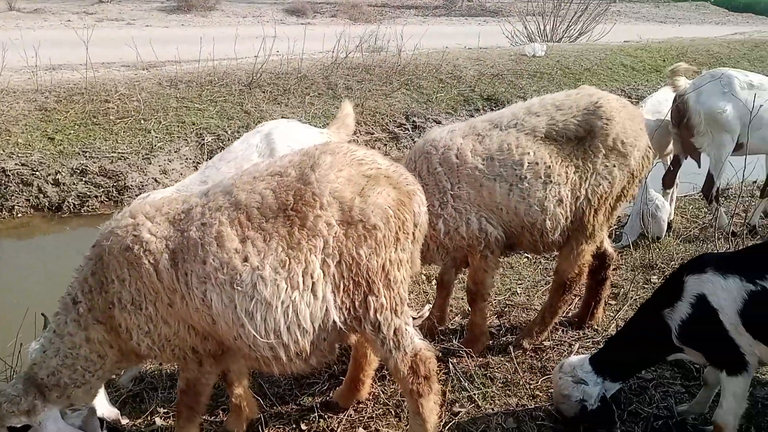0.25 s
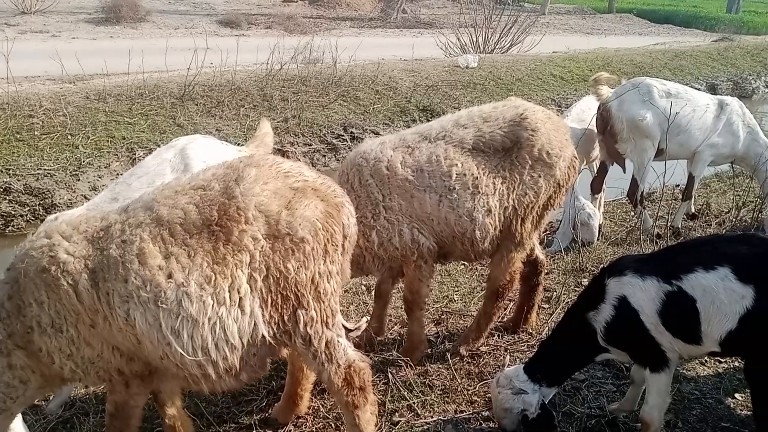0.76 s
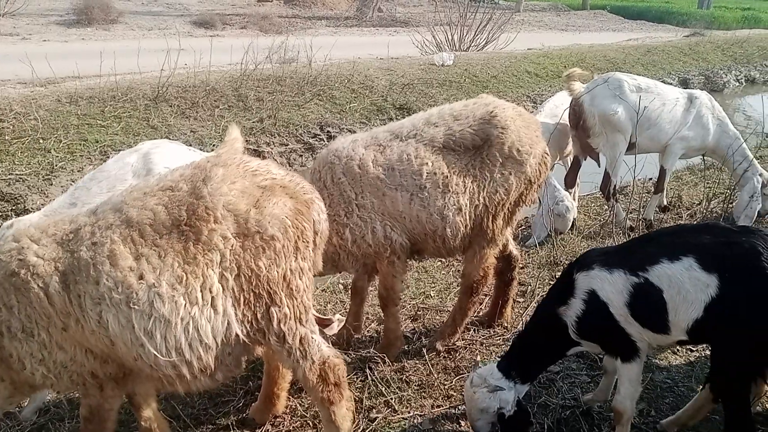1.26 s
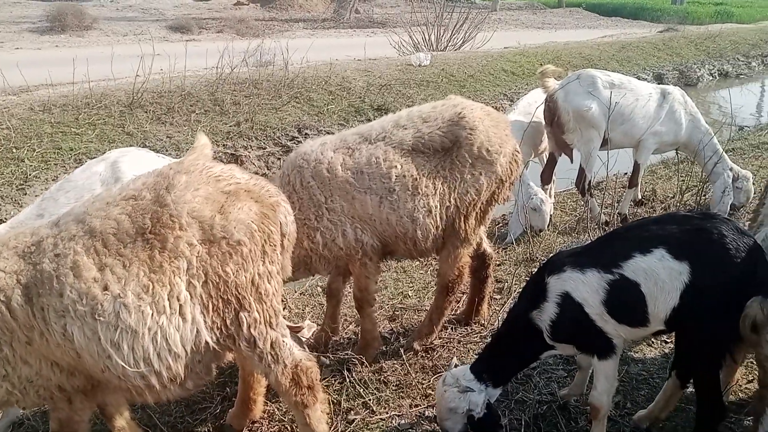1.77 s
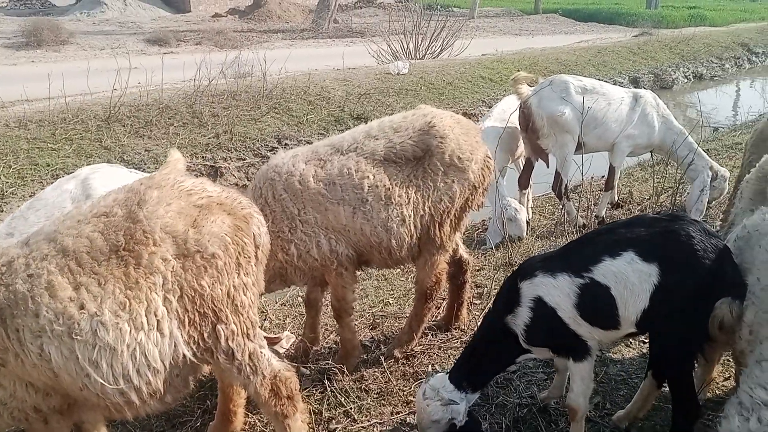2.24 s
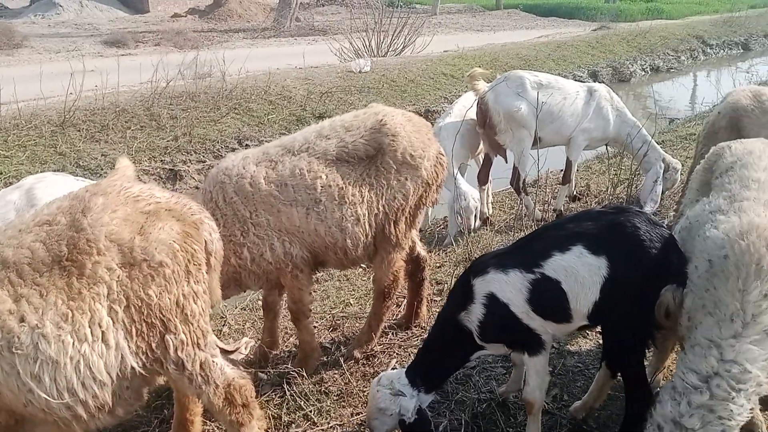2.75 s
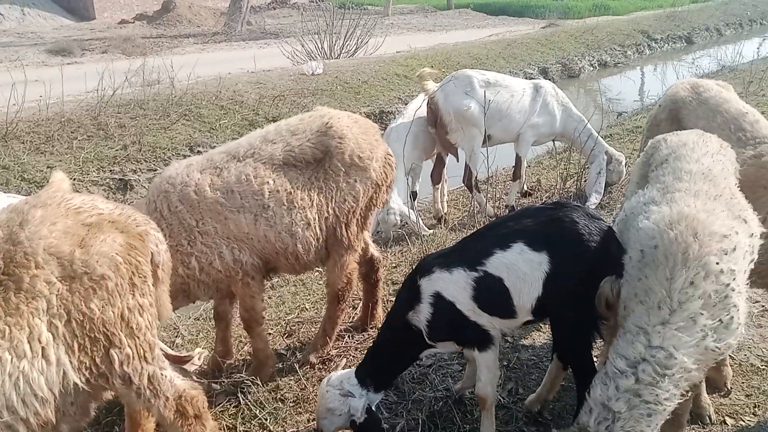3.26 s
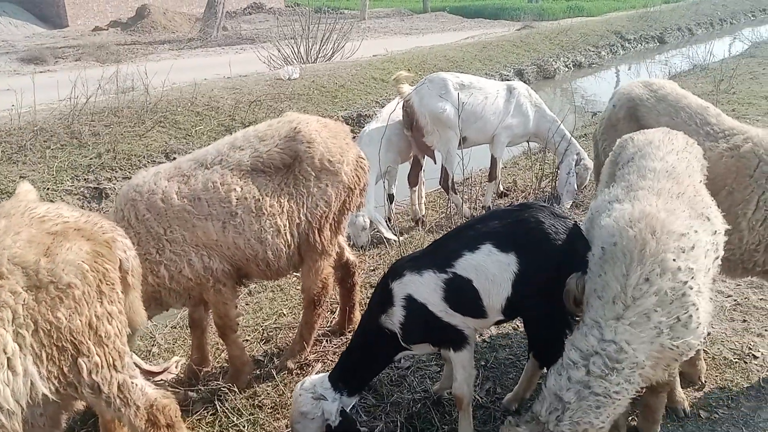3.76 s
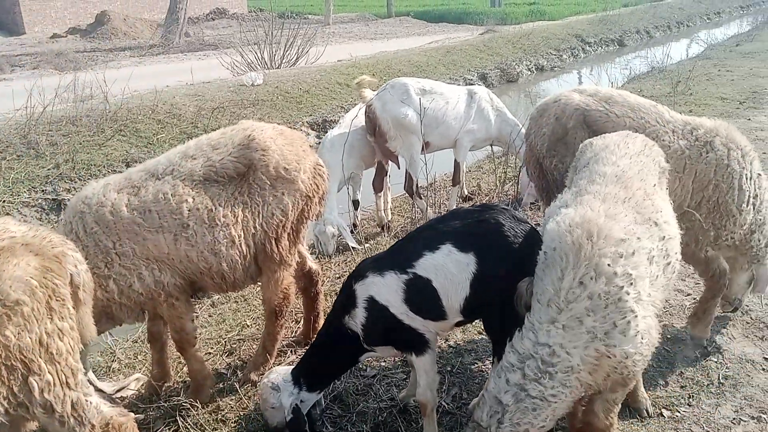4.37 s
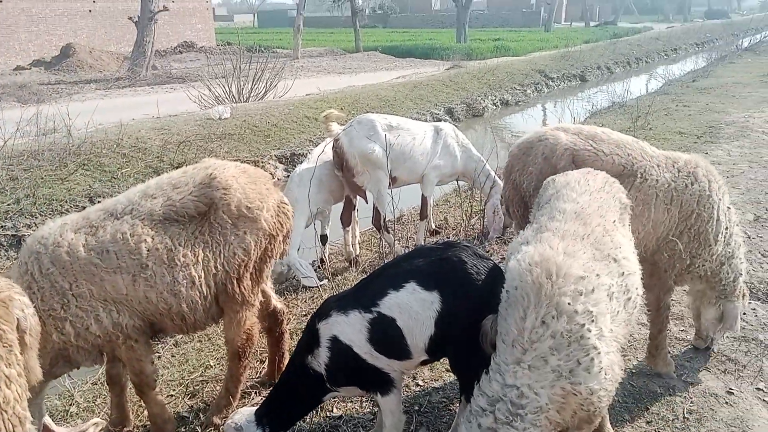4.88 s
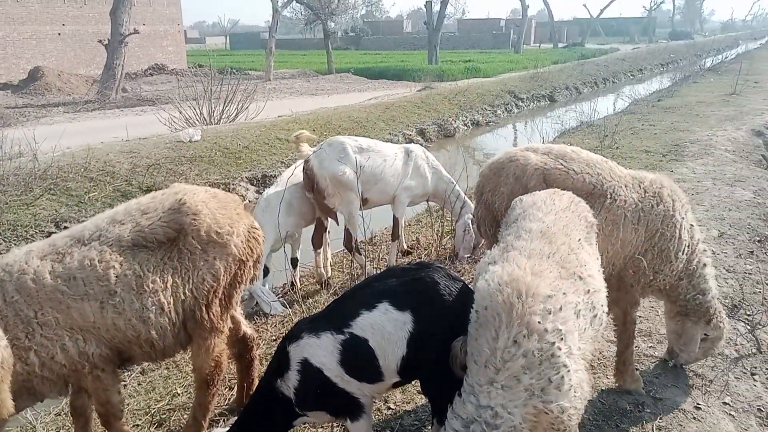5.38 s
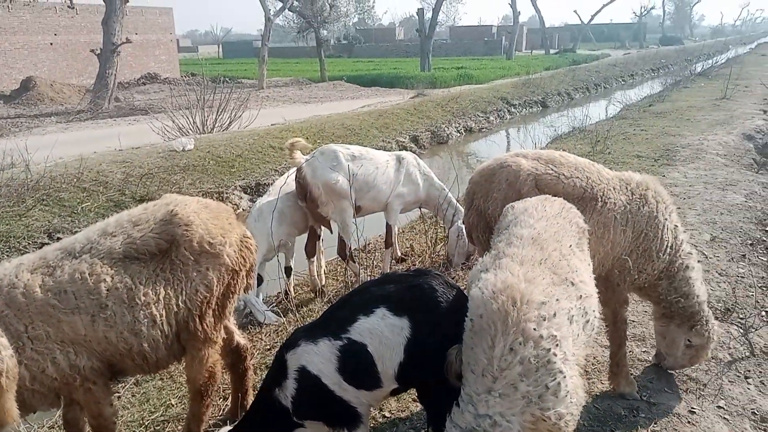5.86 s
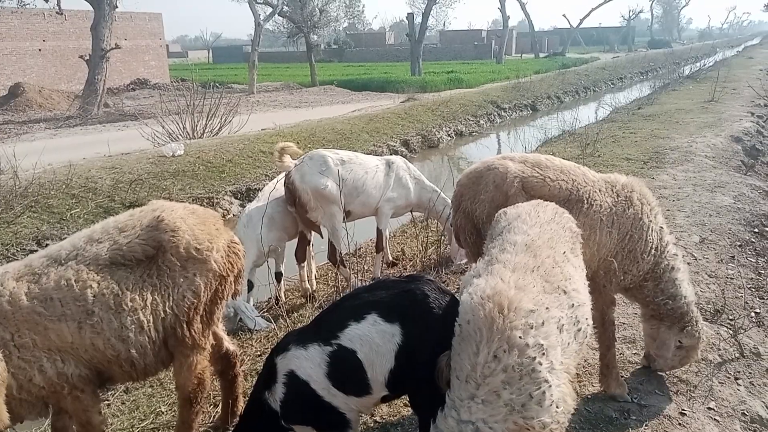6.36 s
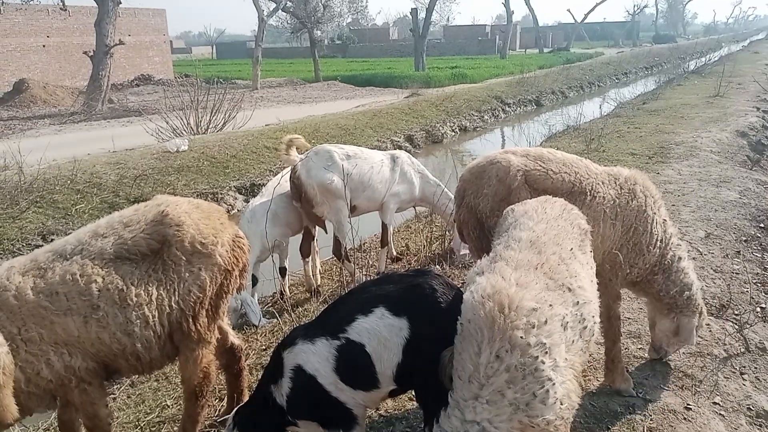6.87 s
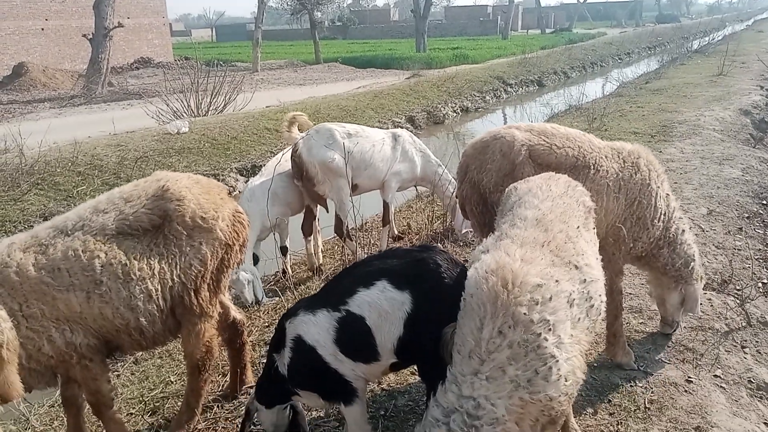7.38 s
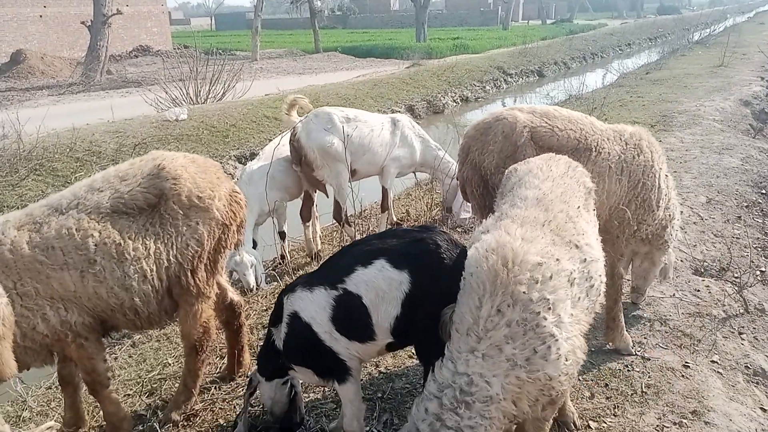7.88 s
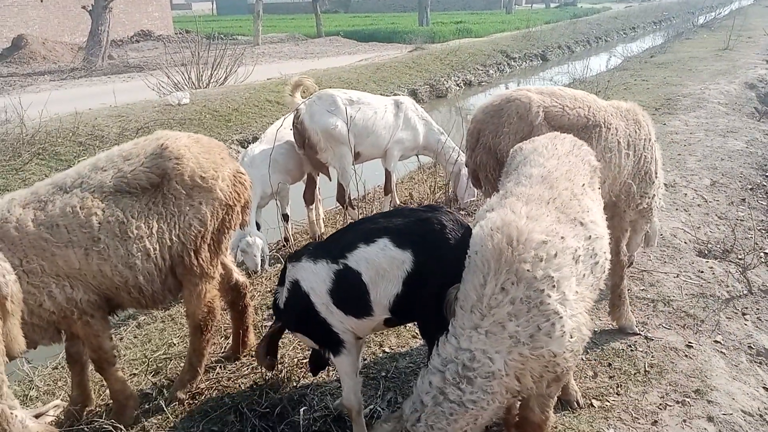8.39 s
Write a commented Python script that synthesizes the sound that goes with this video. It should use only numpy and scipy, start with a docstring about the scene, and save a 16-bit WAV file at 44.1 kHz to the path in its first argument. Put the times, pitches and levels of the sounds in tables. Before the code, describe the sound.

Dry stalks crack and tear under grazing mouths outdoors, over crow caws, bird chirps, rising whistles and later trills, with two short hoarse bleats.

```python
"""Goats and sheep crop dry grass on a canal bank, close by throughout: cracks and rings of stalks, puffs of noise.
First crows caw in far trees (rattling harmonics through a throat) over a small bird's bent notes and buzzes;
from 2 s a bird whistles upward, a kid bleats hoarsely at 3.3 and 7.7 s, and clear caws begin near 3.9 s.
A low hum comes up after 4.6 s; from 5.9 s trills, sagging notes and long slides take over.
Far birds (faint sine slides) and shaped noise for hush and light wind on a phone microphone lie beneath."""
import sys
import numpy as np
from scipy import signal
from scipy.fft import rfft, irfft, next_fast_len
from scipy.io import wavfile
from scipy.ndimage import uniform_filter1d, map_coordinates

SR = 44100
rng = np.random.default_rng(int(sys.argv[2]) if len(sys.argv) > 2 else 0)


def wav_record(signal):
    """Record a signal, one row per channel, as 16-bit PCM in the file named by sys.argv[1]."""
    frames = np.transpose(np.atleast_2d(signal))
    bounded = np.clip(frames, -1, 1)
    # unit amplitude maps onto the largest positive 16-bit level
    quanta = np.round(bounded * 32767).astype(np.int16)
    wavfile.write(sys.argv[1], SR, quanta)


N = 380583


def amp(db):
    """Amplitude factor of a level in dB."""
    return 10 ** (np.asarray(db) / 20)


def unit(x):
    """x scaled to an rms of 1."""
    return x / np.sqrt(np.mean(x ** 2) + 1e-20)


def along(points, hz):
    """Values at hz between (Hz, value) points, on a log frequency axis."""
    f, v = np.transpose(points)
    return np.interp(np.log(hz + 1), np.log(f + 1), v)


def add(track, start, x, edge=0.000485):
    """Mix x into the track from sample start, with soft edges of the given seconds."""
    t = np.arange(len(x)) / SR
    x = x * np.clip(np.minimum(t, t[-1] - t) / edge, 0, 1)
    x = x[:N - start]
    track[start:start + len(x)] += x


def wobble(rate, size=N):
    """A smooth random curve, rate knots a second."""
    knots = rng.standard_normal(int(size * rate / SR) + 4)
    return map_coordinates(knots, [np.arange(size) * rate / SR])


def filtered(x, response):
    """x times a complex response of frequency."""
    m = next_fast_len(len(x) + 8192)
    return irfft(rfft(x, m) * response(np.fft.rfftfreq(m, 1 / SR)), m)[:len(x)]


def noise(spectrum, patchy_db):
    """Coloured noise of rms 1 with time-frequency patches of random gain."""
    z = signal.stft(rng.standard_normal(N), nperseg=512)[2]
    patches = uniform_filter1d(rng.standard_normal(z.shape), size=6, axis=0)
    patches = uniform_filter1d(patches, size=10, axis=1)
    x = signal.istft(z * amp(patchy_db * unit(patches)), nperseg=512)[1][:N]
    return unit(filtered(x, lambda hz: amp(along(spectrum, hz))))


def snaps_and_thuds():
    """Stalks part in a hissing crack and ring on; decaying sines make low thuds and one higher ring."""
    # snapping stalks: (time [s], level [dB], hiss of the crack beside its ring [dB])
    snaps = [(0.304, -47.5, 3), (0.431, -54, -3), (0.4919, -61, -3), (0.5378, -53.5, -13),
             (1.6117, -51.5, 6), (1.9302, -33, -4), (1.9473, -50, -2.5), (2.076, -52.5, 10.5),
             (2.432, -45.5, -16), (2.465, -56, -8), (2.57, -52.5, -18), (2.9131, -51, -8),
             (2.9276, -40, -4), (3.0898, -51, -7), (3.9297, -48, -11), (4.2263, -50, -4),
             (4.245, -27.5, -4), (4.544, -67, 9), (4.561, -59, 2.5), (4.65, -62, 0), (4.8742, -35, 2),
             (5.2691, -53, 0.5), (5.3426, -44, -8), (5.477, -43.5, -6), (5.6456, -52, 1), (5.691, -42, -19),
             (5.8379, -44, -15), (5.8651, -45.5, -16), (6.0562, -39.5, -27), (7.144, -46.5, -20),
             (7.399, -49, -3), (7.5982, -53, 10), (7.7512, -43, -2)]
    # low thuds, and one higher ring under a snap: (time [s], starting level [dB], pitch [Hz])
    thuds = [(2.85, -46, 450), (2.927, -40, 2320), (3.522, -52, 465), (4.244, -50, 420),
             (4.872, -56.5, 321), (5.865, -52.5, 670), (7.145, -61, 423)]
    out, t = np.zeros(N + SR), np.arange(round(.045 * SR)) / SR
    for (s, db, sharp_db), ring_hz in zip(snaps, rng.uniform(5470, 7400, len(snaps))):
        # the fibres part: noise differenced twice, so mostly treble
        crack = amp(-60 * t / 0.0086) * np.diff(rng.standard_normal(len(t) + 2), n=2) / 2
        modes = np.sin(2 * np.pi * ring_hz * t) + 0.36 * np.sin(np.pi * ring_hz * t)
        ring = amp(-60 * t / 0.012) * modes * (1 + 0.63 * wobble(900, size=len(t)))
        onset = 1 + 1.5 * amp(-60 * t / 0.003)
        out[round(s * SR):][:len(t)] += amp(db + 0.5) * (amp(sharp_db) * crack + 0.7 * ring) * onset
    for s, db, hz in thuds:
        out[round(s * SR):][:len(t)] += amp(db - 60 * t / 0.042) * np.sin(2 * np.pi * hz * t)
    return out[:N]


def torn_grass():
    """Torn mouthfuls, small cracks and a dry rustle: one coloured noise under three kinds of envelope."""
    # mouthfuls torn off: (time [s], length [s], level before the wobble and grit [dB])
    tears = [(0.46, 0.045, -67), (0.818, 0.28, -72), (1.348, 0.14, -77), (1.587, 0.052, -52.5),
             (1.696, 0.063, -61), (1.798, 0.27, -64.5), (2.089, 0.181, -71), (4.036, 0.3, -69),
             (4.46, 0.1, -71), (4.805, 0.15, -72.5), (5.04, 0.25, -67), (5.255, 0.21, -67),
             (6.63, 0.94, -72), (7.114, 0.073, -67.5), (7.515, 0.12, -65.5), (7.717, 0.09, -56)]
    # colour of dry grass: (frequency [Hz], relative level [dB per Hz])
    rustle = [(1760, -53.5), (3000, -5), (3690, 0), (5490, 7.5), (9320, -5.5), (13500, -9), (15500, -14.5)]
    rustle_db, grit_share = -91, .8  # resting rustle; how much single fibres stand out of it
    effort = np.full(N, amp(rustle_db))
    for s, length, db in tears:
        add(effort, round(s * SR), amp(db - 2 * np.arange(0, 1, 1 / (length * SR))), edge=0.03)
    chance = 50 / SR * amp(4 * wobble(6))  # of a crack, per sample
    t = np.arange(400) / SR
    fibres = (rng.random(N) < 350 / SR) * rng.exponential(size=N)
    grit = np.convolve(fibres, amp(-60 * t / 0.0087))[:N]
    cracks = (rng.random(N) < chance) * amp(19.4 * rng.random(N))
    puffs = signal.lfilter([1], [1, -np.exp(-1 / (0.003 * SR))], cracks)  # each crack is a puff of noise
    tearing = effort * amp(4.2 * wobble(22)) * (1 + grit_share * grit)
    return (tearing + amp(-76.5) * puffs) * noise(rustle, patchy_db=5)


def grazing():
    """Close to the microphone: single snaps and thuds over the tearing of grass."""
    return snaps_and_thuds() + torn_grass()


def voice(hz, orders, rattle_hz, depth, rough, swing, lift_hz, lift_width_hz=220, lift_db=0):
    """Harmonics on a pitch that a slower rattle shakes in strength and frequency; a resonance lifts some."""
    rattle_hz = rattle_hz * (1 + rough * wobble(38.7, size=len(hz)))
    turn = 2 * np.pi * np.cumsum(rattle_hz) / SR
    shaken_hz = hz * (1 + swing * np.cos(turn) + rough * wobble(159.5, size=len(hz)))
    phase = 2 * np.pi * np.cumsum(shaken_hz) / SR
    tone = 0
    for k, db in orders:
        lift = lift_db * np.exp(-((k * hz - lift_hz) / lift_width_hz) ** 2)
        tone = tone + amp(db + lift) * np.sin(k * phase + k * k)
    return (1 + depth * np.sin(turn)) * tone * np.sqrt(2)


def harsh_caws():
    """Rattling bursts with rasp go through throat resonances, which move up towards mid-caw."""
    # (time [s], length [s], level ahead of the throat [dB], first, last rattle [per s], widest opening [0-1])
    caws = [(-.2, 0.3, -50, 79, 77.5, 0.65), (0.19, 0.42, -52.5, 83.4, 66.4, 0.42),
            (0.94, 0.14, -66, 80.5, 76, 1), (1.138, 0.5, -58, 79, 68.5, 0.94),
            (2.22, 0.4426, -55.5, 76.5, 70.4, 0.56), (3.079, 0.43, -50.5, 76.4, 72.2, 0.7),
            (5.705, 0.26, -66.5, 75.2, 71.3, 1)]
    # unsteadiness of each caw in turn: (share of pitch and rattle rate, also sets the rasp)
    hoarse = [.006, .005, .01, .007, .014, .016, .012]
    # throat resonances: (frequency [Hz], width [Hz], level [dB]), all frequencies scaled by the opening
    resonances = [(1490, 460, -6.5), (1758, 326, 6), (2300, 420, -43), (4530, 325, -10),
                  (5430, 2000, -21.5)]
    top_hz, pitch_sag, swing = 453, .1, 0.1  # sag: share lost at both ends; swing: shake by the rattle
    throat_shut, throat_open = 0.99, 1.069  # factors on the resonances
    harsh, opening = np.zeros(N), np.zeros(N)
    for (s, length, db, first, last, widest), rough in zip(caws, hoarse):
        t = np.arange(max(-s, 0), length, 1 / SR)  # a call may already be under way at the start
        start, arch = round(max(s, 0) * SR), np.sin(np.pi * t / length)
        pitch_hz = top_hz * (1 - pitch_sag * (2 * t / length - 1) ** 2)
        rattle_hz = first + (last - first) * t / length
        even = [(k, 0) for k in range(3, 14)]  # equally strong harmonics
        call = voice(pitch_hz, even, rattle_hz, depth=.6, rough=rough, swing=swing, lift_hz=1850)
        opening[start:][:len(t)] = np.clip(widest, 0, 1) * arch
        rasp = 60 * rough * rng.standard_normal(len(t))
        add(harsh, start, amp(db) * arch ** 0.68 * (call + rasp))

    def throat(f):
        total = 0
        for k, (centre, width, db) in enumerate(resonances):
            band = 1j * f * width / (centre * centre - f * f + 1j * f * width)
            total = total + (-1) ** k * amp(db) * band ** 2
        return total

    shut = filtered(harsh * (1 - opening), lambda f: throat(f / throat_shut))
    opened = filtered(harsh * opening, lambda f: throat(f / throat_open))
    return amp(-1.5) * (shut + opened)


def clear_caws():
    """Arched harmonics after a squeak; the beak lifts whichever harmonic passes its resonance."""
    # (time [s], length [s], top pitch [Hz], base level [dB], tilt above fourth harmonic [dB per harmonic])
    calls = [(3.884, 0.38, 622, -71.5, -2.5), (6.647, 0.37, 616.4, -68.5, 0.5),
             (7.461, .39, 609.7, -70.5, 2), (8.562, 0.37, 629.6, -75.5, 1)]
    # harmonics before tilt and beak: (multiple of the pitch, level [dB])
    harmonics = [(2, -28), (3, 0), (4, 0), (5, -11), (6, -8), (7, -16)]
    # arch of a call: (share of the length, pitch factor, gain over the base level [dB])
    share, factor, gain_db = np.transpose([(0, .8, 2), (0.102, .92, 14), (.25, .99, 11),
                                           (0.621, 1.001, 11.5), (.8, .92, 12.5), (1.002, .8, 13)])
    beak_hz, beak_rise_hz, beak_db = 1850, 320, 11  # rises late in the call
    out = np.zeros(N + SR)
    for s, length, top_hz, db, tilt_db in calls:
        orders = [(k, level + tilt_db * max(k - 4, 0)) for k, level in harmonics]
        u = np.arange(0, 1, 1 / (length * SR))
        hz = uniform_filter1d(top_hz * np.interp(u, share, factor), size=900, mode="nearest")
        lift_hz = beak_hz + beak_rise_hz * np.clip((u - .55) / .15, 0, 1)
        call = voice(hz, orders, rattle_hz=70.32, depth=0.11, rough=.007, swing=0.028,
                     lift_hz=lift_hz, lift_db=beak_db)
        call = amp(db + np.interp(u, share, gain_db)) * call
        squeak = whistle(np.linspace(1950, 2550, num=900), db + 17.0)
        add(out, round((s - .004) * SR), squeak)
        out[round(s * SR):][:len(u)] += call * np.clip(np.minimum(u, 1 - u) / 0.026, 0, 1)
    return out[:N]


def crows():
    """Crows in far trees: harsh rattling caws and clear ones that keep their harmonics."""
    return harsh_caws() + clear_caws()


def kid():
    """Hoarse bleats with lines halfway between the harmonics; the voice breaks downward midway."""
    # one table a bleat: (time [s], pitch [Hz], level ahead of the harmonics [dB])
    bleats = [
        [(3.335, 869, -57), (3.39, 882, -54), (3.415, 995, -51), (3.445, 852, -51), (3.49, 888, -51),
         (3.552, 826, -48), (3.58, 841, -68)],
        [(7.725, 804, -60), (7.775, 941, -51.5), (7.812, 964, -49.5), (7.832, 882, -49.5), (7.92, 852.4, -46),
         (7.95, 835, -56), (7.985, 820, -61)],
    ]
    # lines of the voice before the nose: (multiple of the pitch, level [dB])
    orders = [(1, -18.5), (1.5, -16), (2, 5), (2.5, -8), (4, -29), (4.5, -32.5), (5, -32)]
    nose_hz, nose_db = 3980, 20.5  # a high resonance
    out = np.zeros(N)
    for s, hz, db in map(np.transpose, bleats):
        t = np.arange(s[0], s[-1], 1 / SR)
        call = voice(np.interp(t, s, hz), orders, rattle_hz=63.38, depth=.7, rough=.014, swing=.022,
                     lift_hz=nose_hz, lift_db=nose_db)
        add(out, round(s[0] * SR), amp(np.interp(t, s, db)) * call, edge=0.0086)
    return out


def whistle(hz, db, overtone_db=-26, waver_db=2.5):
    """A bird's tone: a sine of slightly unsteady level with weak overtones."""
    hz = uniform_filter1d(hz, size=90)
    phase = 2 * np.pi * np.cumsum(hz) / SR
    tone = np.sin(phase) + amp(overtone_db) * (np.sin(2 * phase) + 0.19 * np.sin(3 * phase))
    return np.sqrt(2) * amp(db + waver_db * wobble(150.0, size=len(hz))) * tone


def curved(length, start_hz, middle_hz, end_hz, db, overtone_db, swell=0.22):
    """A note whose pitch bends through three points; swell 0 is level, 1 a full swell and fade."""
    u = np.arange(0, 1, 1 / (length * SR))
    hz = start_hz * (1 - u) * (1 - 2 * u) + 4 * middle_hz * u * (1 - u) + end_hz * u * (2 * u - 1)
    return np.sin(np.pi * u) ** np.abs(swell) * whistle(hz, db, overtone_db)


def chirped_phrases():
    """One bird repeats a phrase of bent notes, each time at its own pitch, pace and brightness."""
    # notes before a phrase's own factors and gains:
    # (delay [s], length [s], start [Hz], middle [Hz], end [Hz], level [dB], overtones [dB])
    phrase = [(0, .021, 6480, 5630, 4190, -44, -27), (0.024, 0.017, 4100, 3700, 3500, -43, -16),
              (0.034, 0.024, 3646, 3063, 3060, -35, -22), (0.076, 0.021, 3190, 2860, 2990, -35, -23.5),
              (0.104, 0.022, 3170, 2900, 2980, -35, -23), (0.127, .021, 3150, 2894, 2251, -38, -19.5),
              (0.152, 0.032, 2105, 1991, 1990, -37, -60)]
    # (time [s], pitch factor, time factor, gain [dB],
    #  more gain of the high lead-in [dB], of the low last note [dB], of the overtones [dB])
    chirps = [(0.601, 1.024, 0.98, -4, -5, -12.5, 1.5), (0.89, 1.003, 1.015, -9.5, -24, -20, -18.5),
              (1.151, 0.97, 1.07, -8, 6, -12, 4), (1.443, 0.94, 1.014, -8.5, -11, -12, -21.5),
              (1.747, .98, 1.001, -6.5, 8.5, -14, 4), (2.039, 0.99, 0.94, -14, -5.5, -9, -20.5)]
    out = np.zeros(N)
    for s, factor, pace, gain_db, lead_db, last_db, bright_db in chirps:
        extra_db = [lead_db] + [0] * (len(phrase) - 2) + [last_db]
        for (delay, length, *hz, db, overtone_db), more_db in zip(phrase, extra_db):
            note = curved(pace * length, *factor * np.array(hz), db + gain_db + more_db,
                          overtone_db + bright_db, swell=0.21)
            add(out, round((s + pace * delay) * SR), note)
    return out


def rising_whistles():
    """Tones climb ever more slowly towards a pitch, then end in a hoarse, fading quiver."""
    # (time [s], length without the quiver [s], pitch approached [Hz], level [dB])
    whistles = [(2.012, 0.083, 2220, -54), (2.233, 0.097, 2205, -51.5), (2.459, 0.12, 2212, -52),
                (2.694, 0.13, 2190, -50), (2.937, 0.096, 2184, -47.5), (3.201, 0.092, 2162, -45),
                (3.47, 0.082, 2180, -44.5), (3.75, 0.08, 2154, -48), (4.01, 0.11, 2160, -48.5),
                (4.305, 0.098, 2162, -49.5), (4.581, 0.1, 2177, -48), (4.859, 0.1, 2194, -47),
                (5.153, 0.11, 2181, -48.5), (5.452, 0.1, 2176, -55)]
    out = np.zeros(N)
    for s, length, end_hz, db in whistles:
        t = np.arange(0, length, 1 / SR)
        hz = end_hz - 170 * np.exp(-t / 0.0442) - 150 * np.exp(-t / 0.0074)
        rise = whistle(hz, db - 14 * np.exp(-t / 0.0051), overtone_db=-58.0, waver_db=1.6)
        add(out, round(s * SR), rise, edge=0.002)
        end = np.arange(0, .03, 1 / SR)
        shaken_hz = end_hz - 30 + 300 * np.sin(2 * np.pi * 130 * end)
        add(out, round((s + length) * SR), whistle(shaken_hz, db - 10 - 200 * end, waver_db=5))
    return out


def loose_notes():
    """Several small birds: sines that bend, stay steady, sag at the end or slide with a fading octave."""
    # curved notes: (time [s], length [s], start [Hz], middle [Hz], end [Hz], level [dB])
    notes = [(0, 0.12, 5780, 4300, 2850, -63.5), (0.132, 0.02, 3846, 5970, 3700, -60),
             (0.161, 0.014, 3580, 4590, 5500, -56), (0.169, 0.035, 4340, 4020, 3350, -58),
             (0.246, 0.066, 5200, 5200, 4600, -58.5), (0.435, 0.032, 6040, 5360, 4320, -55.5),
             (0.467, 0.0326, 4120, 4000, 3195, -54.5), (0.863, 0.053, 2900, 4000, 3200, -62),
             (0.917, 0.0127, 4015, 4074, 3830, -65), (0.926, 0.034, 3850, 5500, 4600, -55.5),
             (1.076, 0.016, 4740, 5330, 4370, -54), (1.309, 0.057, 4500, 4550, 3410, -58.5),
             (1.693, 0.05, 6473, 5680, 4550, -61.5), (1.949, 0.029, 4720, 4270, 3680, -53.5),
             (2.231, 0.026, 4430, 4190, 3720, -62), (2.939, 0.031, 5320, 5100, 4530, -61.5),
             (4.128, 0.026, 4960, 4580, 4000, -57.5), (5.081, 0.076, 7235, 6030, 5400, -64.5),
             (5.156, 0.05, 5280, 4664, 4200, -65), (5.222, 0.033, 4100, 3817, 3260, -65),
             (7.207, 0.16, 5747, 5440, 3930, -54), (7.551, 0.02, 6430, 6080, 6030, -57.5),
             (7.573, 0.084, 6750, 5470, 4370, -54.5), (7.783, 0.062, 6500, 5965, 4500, -51),
             (7.892, 0.025, 6400, 4880, 2980, -53.5), (8.015, 0.061, 3150, 4040, 3156, -60.5),
             (8.082, 0.029, 4150, 5512, 4680, -47.5), (8.162, 0.0081, 5140, 5730, 5000, -48),
             (8.172, 0.0075, 5050, 6690, 4900, -46.5), (8.176, 0.0069, 3950, 3687, 3900, -54.5),
             (8.193, 0.045, 3070, 3360, 2724, -58), (8.396, 0.029, 2408, 2425, 1950, -59.5)]
    # steady notes, low hoots to short high peeps: (time [s], length [s], pitch [Hz], level [dB])
    steady = [(1.7, 0.0586, 2458, -63.5), (2.102, 0.014, 6573, -58), (2.846, 0.0086, 3930, -60.5),
              (3.826, 0.016, 3320, -54.5), (4.102, 0.029, 8970, -64.5), (4.427, 0.027, 3330, -69),
              (4.512, 0.0184, 3300, -66), (7.27, 0.13, 1197, -70), (5.086, 0.028, 9010, -62),
              (6.853, 0.071, 1411, -58.5), (7.085, 0.11, 1482, -63.5), (7.097, 0.049, 1718, -59.5),
              (7.13, 0.063, 2150, -53.5), (7.335, 0.13, 1470, -61.5), (7.49, 0.076, 1168, -71),
              (7.613, 0.109, 1448, -61.5), (8.39, 0.18, 1164, -71)]
    # held notes: (time [s], hold [s], pitch [Hz], sag [s], end [Hz], level before the sag [dB])
    held = [(5.944, 0.047, 2411, 0.034, 1870, -53), (6.244, 0.11, 2370, 0.037, 1640, -56.5),
            (6.748, 0.061, 2322, 0.032, 1553, -48.5), (7.894, 0.0637, 2229, 0.0099, 2187, -49.5),
            (8.133, 0.0845, 2198, 0.0265, 1950, -45.5), (8.424, 0.071, 2228, 0.084, 1500, -45)]
    # falling slides: (time [s], length [s], start [Hz], middle [Hz], end [Hz], level before its loss [dB])
    slides = [(5.964, 0.205, 4270, 2197, 1604, -43.5), (6.509, 0.17, 4420, 2630, 1530, -40.5)]
    sag_loss_db, slide_loss_db = 7.5, 9  # fainter by the end
    octave_db, octave_fade_db = -15.5, 38  # the octave over a slide, and its loss by the end
    out = np.zeros(N)
    for s, *note in notes:
        add(out, round(s * SR), curved(*note, overtone_db=-38.0))
    for s, length, hz, db in steady:
        add(out, round(s * SR), curved(length, hz, hz, hz, db, overtone_db=-35.0))
    for s, hold, hz, sag, end_hz, db in held:
        u = np.clip((np.arange(0, hold + sag, 1 / SR) - hold) / sag, 0, 1)
        glide = uniform_filter1d(hz + (end_hz - hz) * u, size=500, mode="nearest")
        add(out, round(s * SR), whistle(glide, db - sag_loss_db * u ** 2, overtone_db=-59.0), edge=0.013)
    for s, length, *slide in slides:
        u = np.arange(0, 1, 1 / (length * SR))
        tone = curved(length, *slide, octave_db - octave_fade_db * u ** 2)
        level = amp(3.32 * wobble(67, size=len(u)) - slide_loss_db * u)
        add(out, round(s * SR), np.sin(np.pi * u) ** 0.55 * level * tone)
    return out


def trills():
    """Evenly paced arched notes over a rough undertone, ever deeper; falling ticks close the trill."""
    # (first, last note [s], first, last top pitch [Hz], first, last level [dB])
    runs = [(5.866, 5.948, 3340, 3447, -51, -55.5), (6.117, 6.232, 3190, 3484, -57, -43),
            (6.363, 6.482, 3156, 3166, -54, -46), (6.593, 6.715, 3136, 3350, -48, -45.5),
            (6.829, 6.943, 3186, 3200, -52.5, -46.5), (7.055, 7.172, 3130, 3330, -51, -48),
            (7.286, 7.405, 3120, 3233, -58, -49), (7.509, 7.644, 3000, 3224, -56, -46.5),
            (7.816, 7.881, 3046, 3200, -45, -47)]
    pace_s, note_s = .0245, .022  # approximate spacing; length of a note
    first_dip_hz, last_dip_hz, dip_db = 300, 1150, 2.5  # how far the ends of a note hang below its top
    undertone_hz, undertone_db = 2250, -12
    out = np.zeros(N)
    dip = np.abs(np.linspace(-1, 1, round(note_s * SR))) ** 3.69
    size = len(dip)
    for first, last, first_hz, last_hz, first_db, last_db in runs:
        count = round((last - first) / pace_s) + 1
        for u, (detune, scatter, late) in zip(np.linspace(0, 1, count), rng.standard_normal((count, 3))):
            dip_hz = first_dip_hz + (last_dip_hz - first_dip_hz) * u
            hz = first_hz + (last_hz - first_hz) * u + 40 * detune - dip_hz * dip
            level_db = first_db + (last_db - first_db) * np.sqrt(u) + 0.99 * scatter
            level_db = level_db - dip_db * dip + 2.4 * wobble(233.0, size=size)
            under_hz = undertone_hz + 160 * wobble(200, size=size)
            under = whistle(under_hz, level_db + undertone_db, overtone_db=-20.0)
            start = round((first + (last - first) * u + 0.00056 * late) * SR) - size // 2
            add(out, start, whistle(hz, level_db, overtone_db=-24.5) + under, edge=0.00049)
        for delay, tick_db in (.011, -4), (.022, -15), (.033, -12):
            tick = curved(0.016, last_hz + 250, last_hz - 200, 2060, last_db + tick_db, overtone_db=-33.0)
            add(out, round((last + delay) * SR), tick)
    return out


def buzzes():
    """A sweeping tone and narrow noise, chopped about 110 times a second, swell by 6 dB."""
    # (time [s], length [s], level at the start [dB])
    bursts = [(0.956, 0.11, -50.5), (1.285, 0.084, -58), (1.549, 0.1084, -51), (1.855, 0.097, -54.5)]
    # colour of the noise: (frequency [Hz], relative level [dB per Hz])
    band_points = [(2300, -46), (2800, 19.5), (3400, 34), (4000, 18), (4500, -42)]
    centre_hz, swing_hz, tone_share = 3150, 650, .55  # the tone sweeps down once a chop
    out = np.zeros(N)
    band = noise(band_points, patchy_db=1.5)
    for s, length, db in bursts:
        t, start = np.arange(0, length, 1 / SR), round(s * SR)
        cycle = np.cumsum(110 * (1 + 0.09 * wobble(60, size=len(t)))) / SR
        chop = (1 + 0.28 * np.sin(2 * np.pi * cycle)) * amp(db + 6 * t / length)
        tone = whistle(centre_hz + swing_hz * np.cos(np.pi * (cycle % 1)), 0, overtone_db=-18.5)
        mixed = tone_share * tone + (1 - tone_share) * band[start:][:len(t)]
        add(out, start, chop * mixed, edge=0.01)
    return out


def songbirds():
    """All the nearer small birds: phrases, whistles, loose notes, trills and buzzes."""
    return chirped_phrases() + rising_whistles() + loose_notes() + trills() + buzzes()


def trees(x, t60):
    """Scattered echoes off trunks and walls: a decaying noise tail, t60 seconds to fall 60 dB."""
    t = np.arange(SR // 2) / SR
    tail = rng.standard_normal(len(t)) * amp(-60 * t / t60) * (t > .008)
    return signal.fftconvolve(x, tail / np.linalg.norm(tail))[:N]


def flock(count=260):
    """Far small birds: faint random sine slides, blurred by distance."""
    out = np.zeros(N)
    for when, pitch, slide, long, loud in rng.random((count, 5)):
        u = np.arange(0, 1, 1 / ((0.032 + 0.054 * long) * SR))
        hz = 2300 * 3 ** pitch * (1 + 0.46 * (slide - .65) * u)
        tone = np.sin(np.pi * u) * np.sin(2 * np.pi * np.cumsum(hz) / SR)
        add(out, round(when * (N - SR // 10)), amp(-72 - 16 * loud) * tone)
    return .7 * out + trees(out, t60=0.12)


def wind():
    """Light wind on the microphone port: low noise whose level wanders and bumps up in gusts."""
    # gusts: (time [s], peak level [dB], length [s])
    gusts = [(1.767, -56, 0.048), (2.487, -58.5, 0.039), (3.013, -59, 0.11), (3.155, -47, 0.027),
             (3.263, -47, 0.069)]
    # colour of the wind: (frequency [Hz], relative level [dB per Hz])
    rumble = [(15, -51.5), (30, -13), (75, 4.5), (119, 3.5), (281, -19.5), (350, -49), (460, -26),
              (770, -120)]
    t, level = np.arange(N) / SR, amp(-73 + 3.5 * wobble(13))
    for s, db, length in gusts:
        level = level + amp(db) * np.exp(-((t - s - length / 2) / np.abs(length / 2)) ** 2)
    return level * noise(rumble, patchy_db=-1.0)


def distance():
    """Far off: a wavering drone, a low hum that comes up, and the hush with microphone hiss."""
    # drone: (time [s], length [s], level before its waver [dB])
    drones = [(1.517, 1, -77), (5.297, 0.59, -78)]
    # colour of the hum: (frequency [Hz], relative level [dB per Hz])
    hum_points = [(100, -40), (130, 0.5), (160, -2.5), (200, -16), (280, -44.5)]
    # colour of far hush and microphone hiss: (frequency [Hz], relative level [dB per Hz])
    field = [(120, -66), (200, -13.5), (353, -13.5), (881, -17.5), (1470, -9), (2080, -4.5), (2690, -12),
             (4030, -25), (5810, -15.5), (13500, -32), (15100, -16.5), (15900, -11)]
    hum_s, hum_rise_s, hum_db = 4.63, 0.56, -75  # when it comes up, over how long, and its level
    t = np.arange(N) / SR
    tone = np.sin(2 * np.pi * np.cumsum(600 + 40 * wobble(90)) / SR) * amp(7 * wobble(18))
    drone = sum(amp(db) * np.sin(np.pi * np.clip((t - s) / length, 0, 1)) for s, length, db in drones) * tone
    hum = amp(hum_db) * np.clip((t - hum_s) / hum_rise_s, 0, 1) * noise(hum_points, patchy_db=3.0)
    return drone + hum + amp(-64.5) * noise(field, patchy_db=3.5)


def scene():
    """Grazing close by, birds and kid with their echoes, then the far flock and the air."""
    birds, far = songbirds(), crows() + kid()
    near_scatter = trees(amp(-12.5) * birds, t60=.08)
    far_scatter = trees(amp(-14.5) * birds + amp(-8) * far, t60=0.24)
    voices = birds + far + near_scatter + far_scatter
    return (grazing() + voices + flock() + wind() + distance())[None]


def record(dry):
    """The microphone colours the high treble and keeps nothing above its band limit."""
    # two dips in the high treble: (centre [Hz], width [Hz], gain [dB])
    treble = [(13350, 2920, -10.5), (15400, 900, -5)]
    top_hz = 15850

    def response(hz):
        colour_db = sum(db * np.exp(-((hz - centre) / width) ** 2) for centre, width, db in treble)
        return amp(colour_db) * (hz < top_hz)

    return filtered(dry[0], response)[None]


dry = scene()
out = record(dry)
wav_record(out)
```